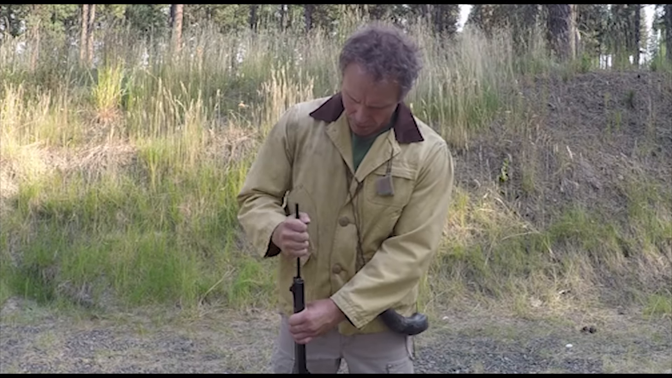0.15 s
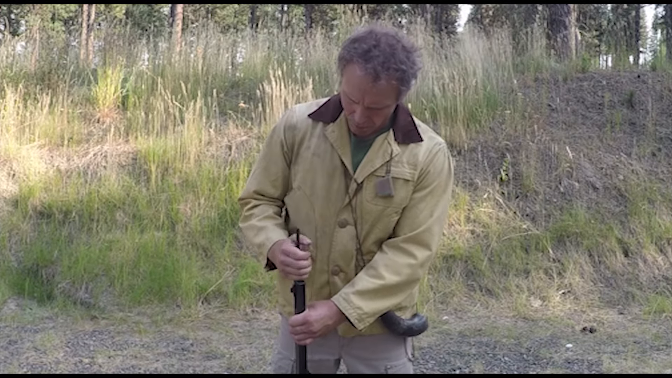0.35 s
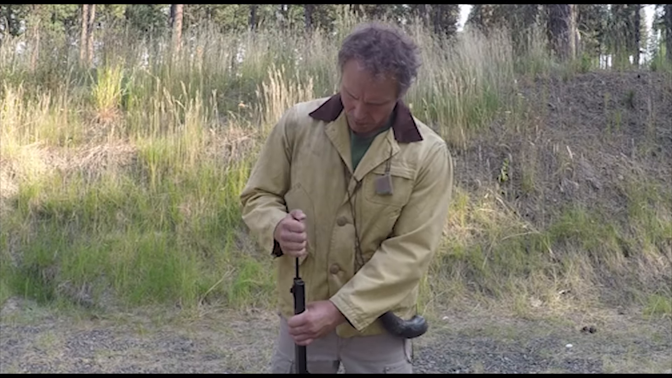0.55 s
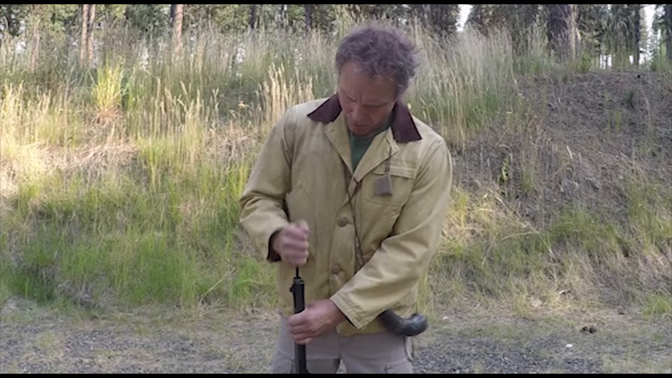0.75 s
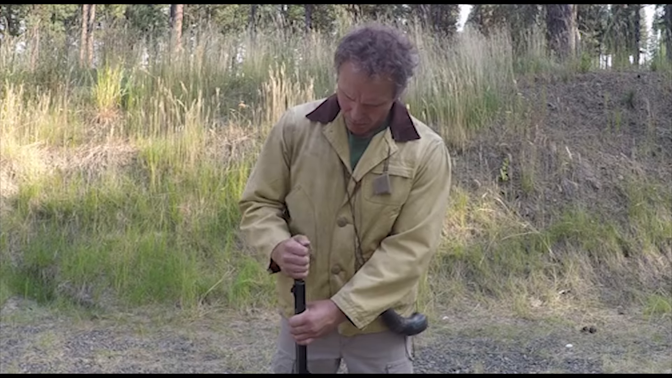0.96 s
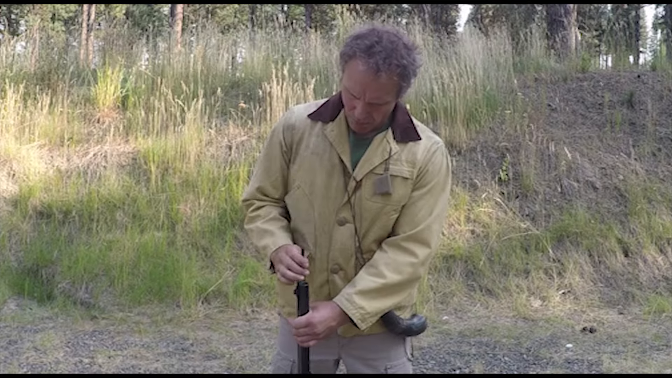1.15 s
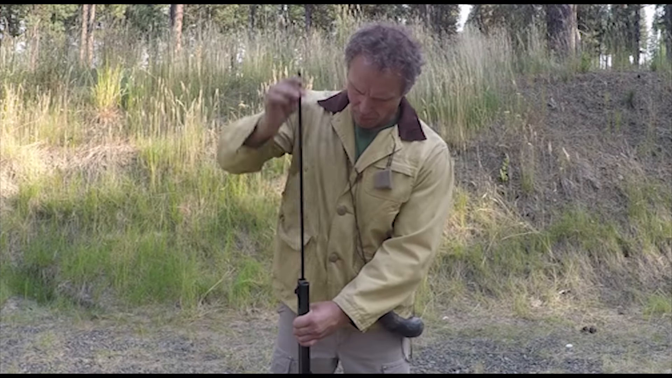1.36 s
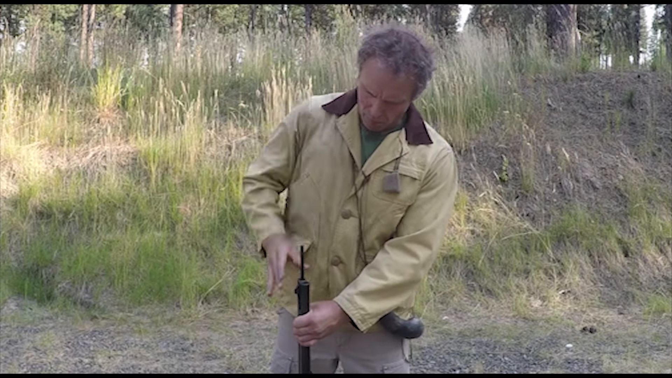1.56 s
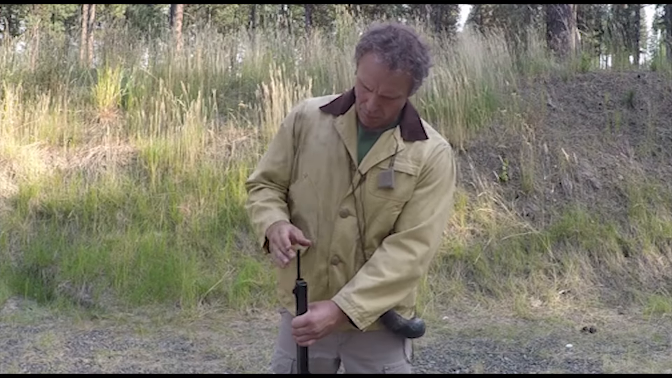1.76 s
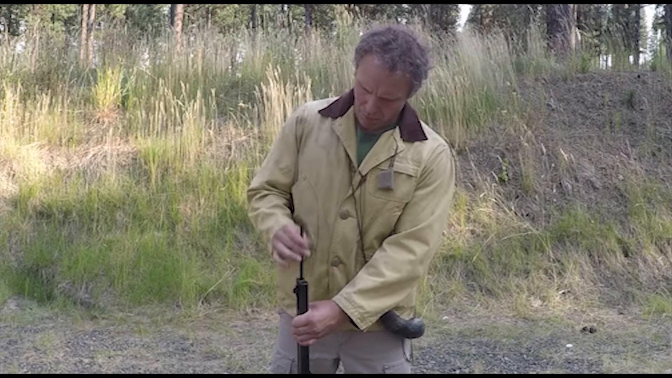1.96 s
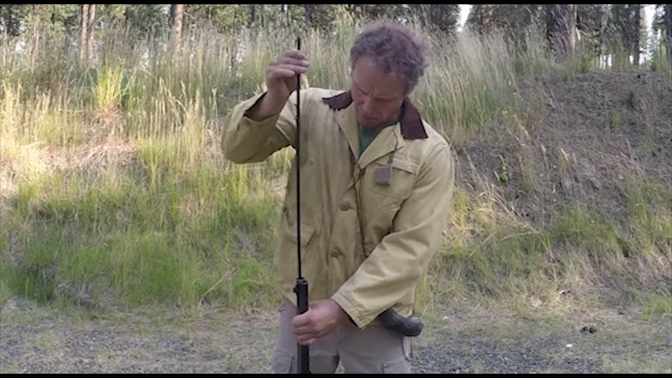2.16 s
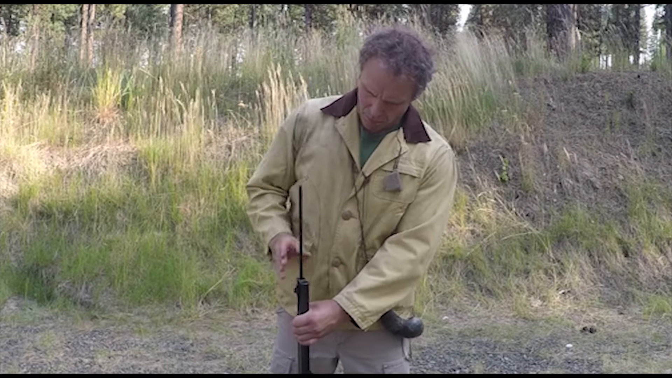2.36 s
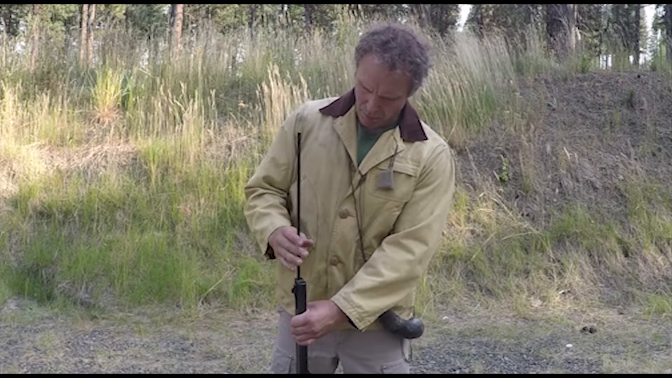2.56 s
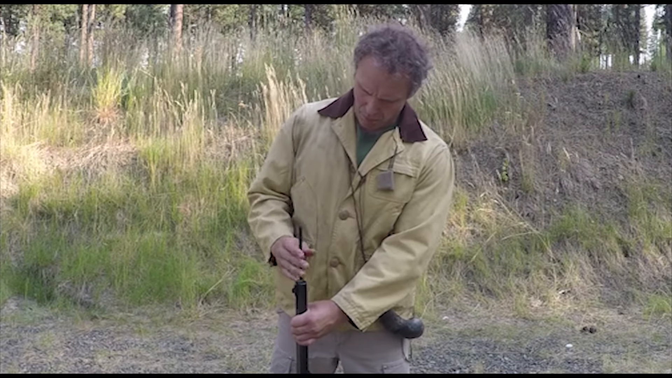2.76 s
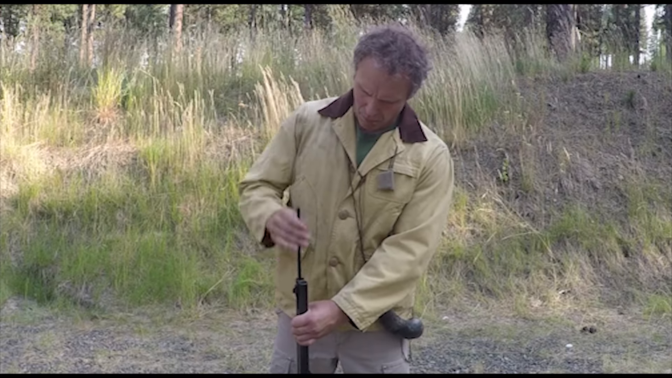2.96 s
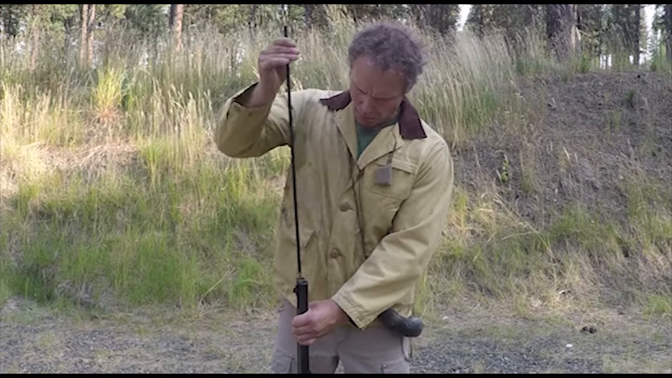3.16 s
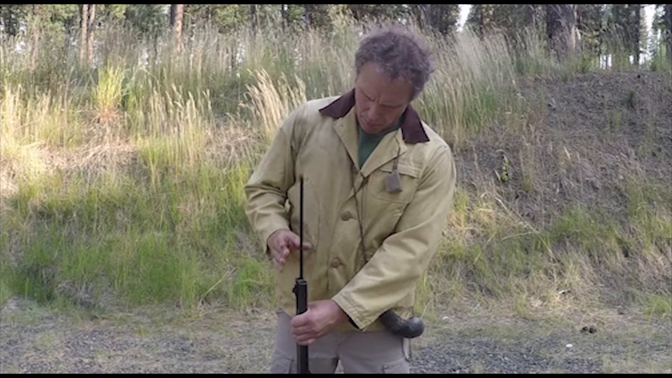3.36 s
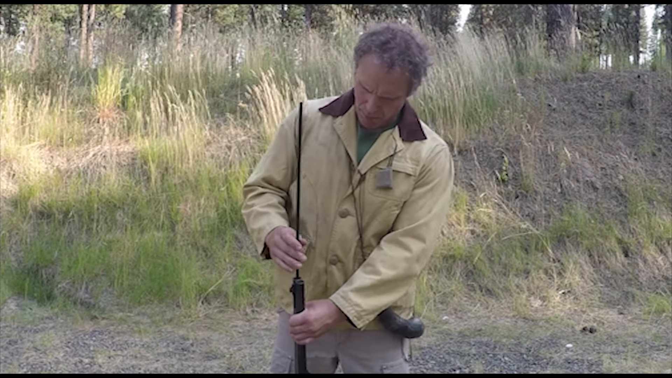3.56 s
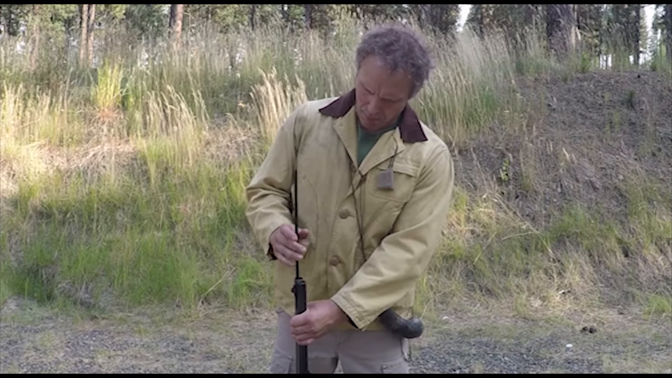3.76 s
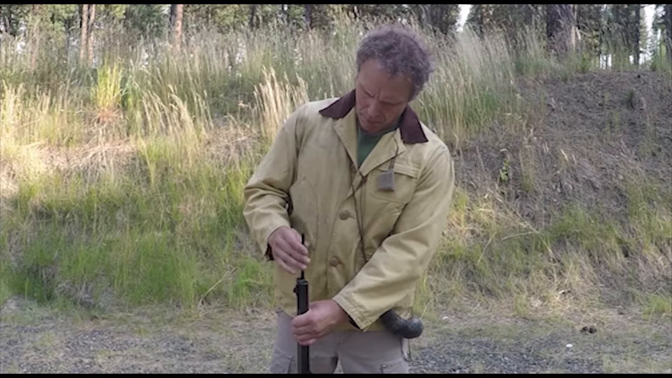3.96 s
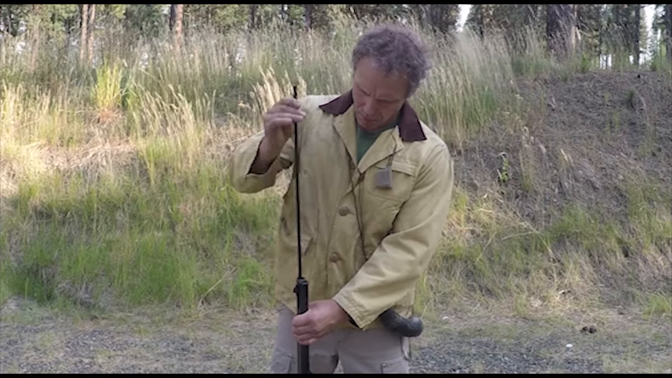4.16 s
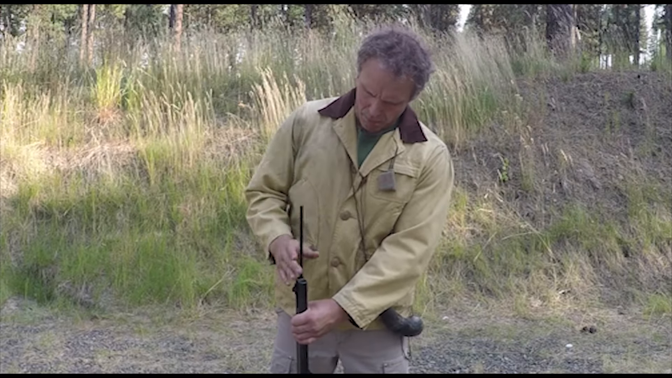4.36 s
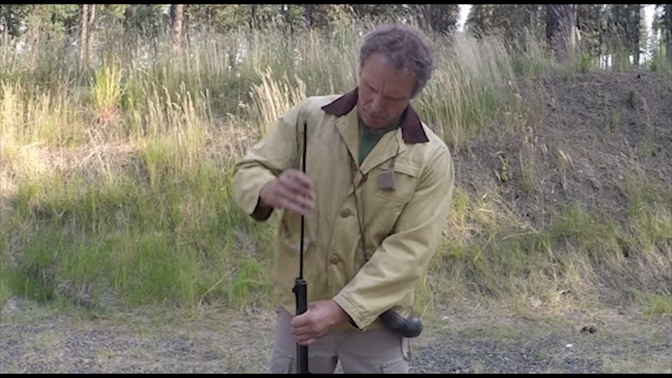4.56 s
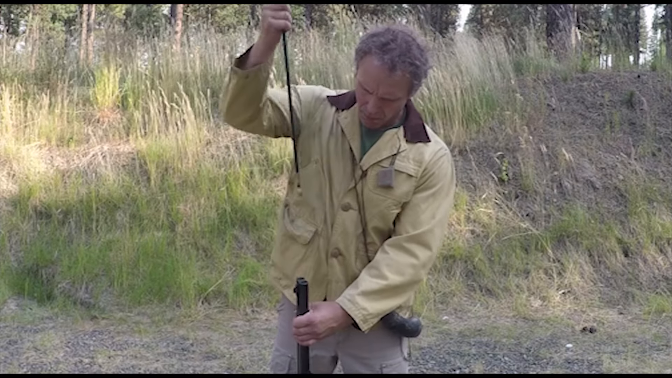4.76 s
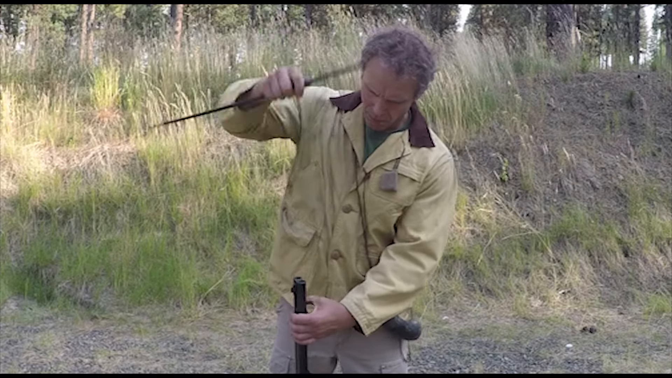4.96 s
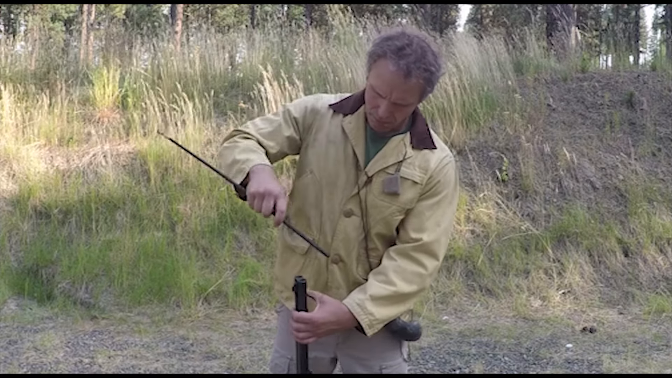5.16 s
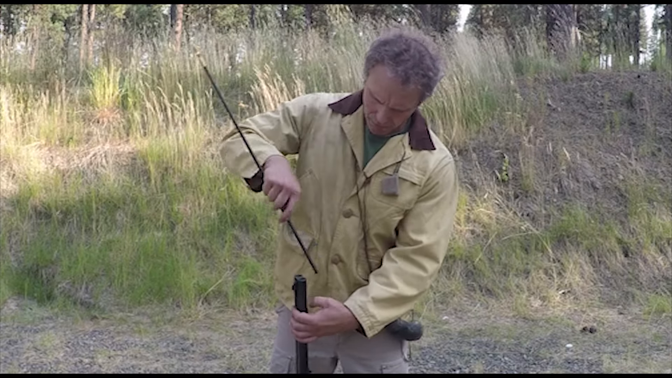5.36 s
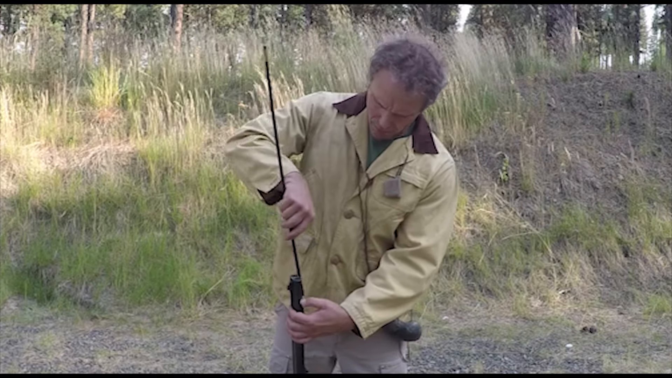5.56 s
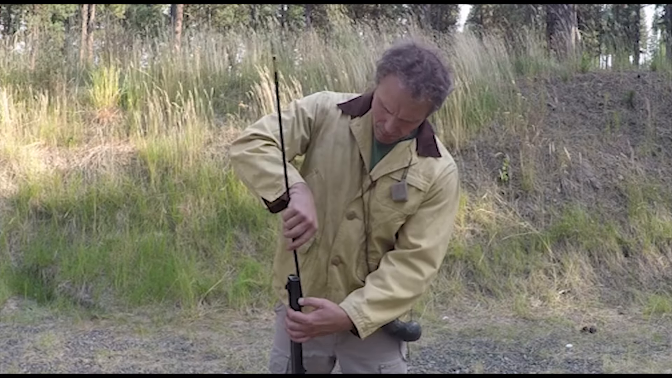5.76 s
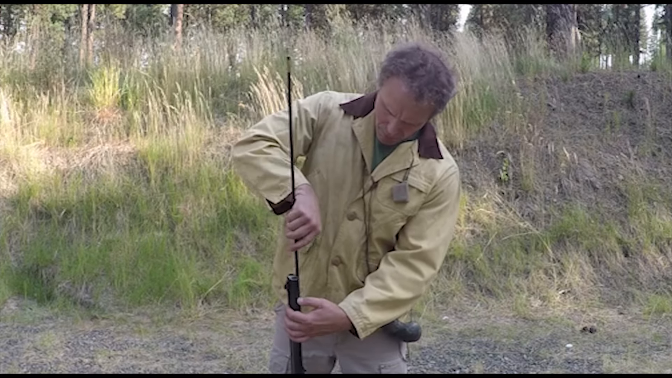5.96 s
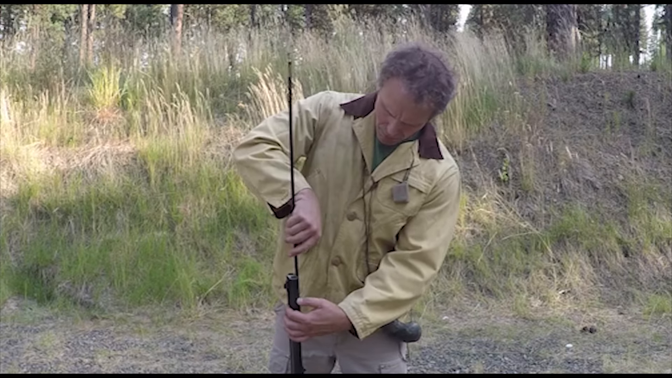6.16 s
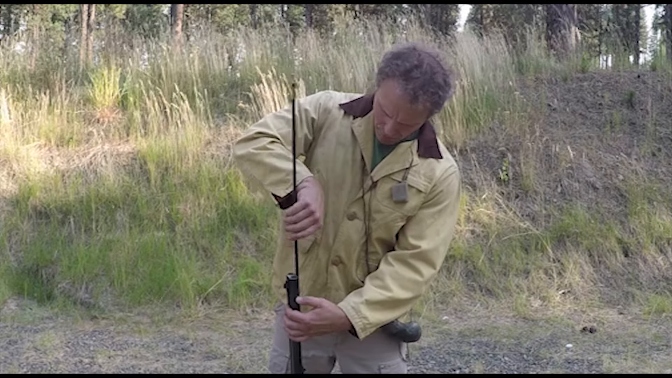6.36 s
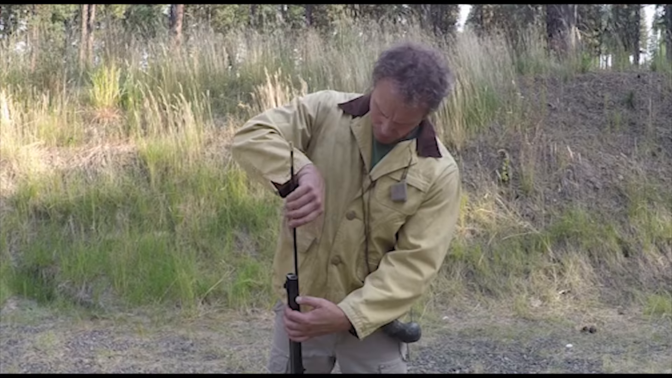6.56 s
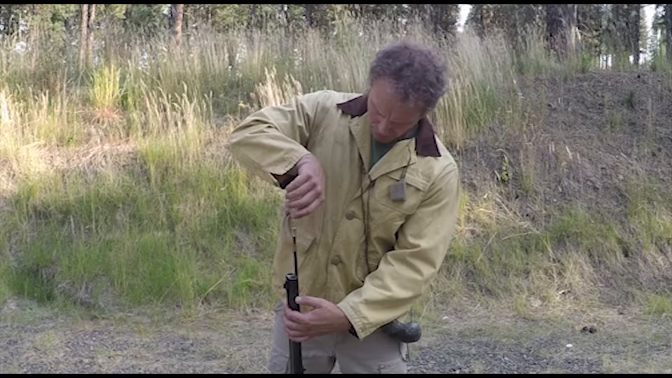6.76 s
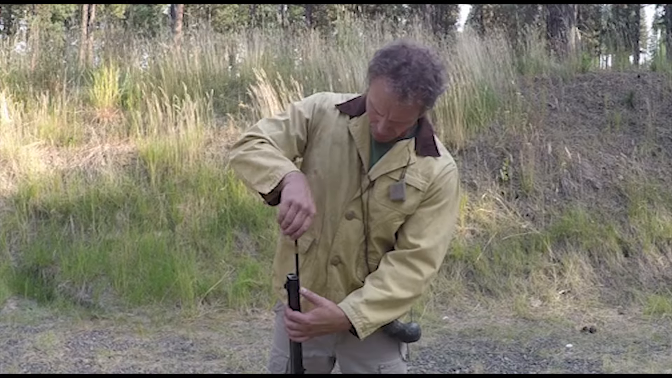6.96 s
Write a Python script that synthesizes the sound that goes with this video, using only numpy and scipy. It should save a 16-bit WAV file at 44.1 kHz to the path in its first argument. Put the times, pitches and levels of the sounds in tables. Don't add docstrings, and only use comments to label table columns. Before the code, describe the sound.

A steel ramrod is rammed and bounced down a rifle barrel, sharp metallic clacks with hollow booms and light rattling, then slid into its pipes outdoors.

```python
import sys
import numpy as np
from scipy import signal
from scipy.io import wavfile

SR = 44100
rng = np.random.default_rng(int(sys.argv[2]) if len(sys.argv) > 2 else 0)


def boost(x):
    u = np.asarray(x, float) / 20
    return 10 ** u


def master_out(mix):
    frames = np.transpose(np.atleast_2d(mix))
    ceiling = np.clip(frames, -1, 1)
    pcm = np.round(ceiling * 32767).astype(np.int16)
    wavfile.write(sys.argv[1], SR, pcm)


N = 308987

# (time [s], lowest note [Hz], fall [octaves/s], boom
# level [dB], time to fade 60 dB [s])
LANDINGS = [(0.0238, 263, 10.5, -18.5, 0.082), (0.2921, 169, 1.5, -19.5, 0.031),
            (0.4483, 155, 0.1, -27, 0.016), (0.8429, 164.4, 3, -16, 0.07), (1.648, 148.4, 0.11, -9.5, 0.08),
            (2.376, 148.8, 0.1, -7.5, 0.051), (2.876, 148.8, 0.1, -18.5, 0.092),
            (3.378, 150, 0.1, -8, 0.069), (3.941, 149.3, 0.073, -17, 0.09),
            (4.3668, 148.5, 0.1, -9.5, 0.042), (6.602, 645, 0.1, -25, 0.03), (6.795, 774, 0.1, -18, 0.051)]
# (time [s], clack level [dB], barrel ring re clack [dB],
# ring across the bore re clack [dB], barrel mode struck [Hz])
BLOWS = [(0.022, -8, 4, -1, 2290), (0.2915, -10.5, -4, -3.5, 1630), (0.8412, -4.5, -0.5, -14, 1730),
         (1.647, -8, 3.5, 4, 1350), (2.3768, -5.5, 0, 5, 1580), (2.8756, -15, 6, -1.5, 1350),
         (3.3786, -4.5, -0.5, 3.5, 1700), (3.942, -12, 5, -2, 1350), (4.367, -4.5, 6, 2, 2300),
         (6.6032, -9, -7, 3.5, 1890), (6.7965, -2, -6.5, 0.5, 1700)]


def ramrod():
    # (pitch [Hz], width [Hz], level [dB])
    rod_modes = [(2603, 57, 5), (2870, 160, 12), (3440, 250, -3.5), (3610, 100, 8), (4247, 120, 5),
                 (5150, 205, 7.5), (5324, 110, 3), (6420, 110, -6.5)]
    # (pitch [Hz], width [Hz], level [dB])
    barrel_modes = [(1220, 50, -6.5), (1350, 193, 0.5), (1580, 23, -3), (1700, 45, 1), (1838, 13.7, -3),
                    (1970, 37, -5), (2182, 36, -5.5)]
    # (pitch [Hz], width [Hz], level [dB])
    across_modes = [(8900, 300, -9), (10100, 300, -9), (11500, 400, -4), (12000, 300, -3), (12500, 340, -1),
                    (13000, 350, -2), (13800, 450, -4), (14600, 400, -8)]
    s, clack, ring, top, barrel_hz, rod_hz = contacts()
    steady = (sliding() + faint_ticks()) * boost([[-7.5], [-3.5], [-19]])
    steady += boost([[-1.5], [-8.5], [-6.5]]) * rattle(t60=0.062)
    shimmer = bore_shimmer(t60=0.56)
    steady[2] *= 0.44 + shimmer
    rod = metal(rod_modes, s, clack, rod_hz, 0.16, steady[0], (2200, 6800), broad_db=-6.0,
                modes_db=-9.5, hard=0.62, t60=0.033, lumpy_db=5.0, drag_hiss=1.7)
    barrel = metal(barrel_modes, s, clack + ring, barrel_hz, 0.05, steady[1], (1000, 2300), broad_db=-10.0,
                   modes_db=-0.5, hard=0.76, t60=0.046, lumpy_db=5.5, drag_hiss=1.0)
    across = metal(across_modes, s, clack + top, 0 * s + 12600, 0.22, steady[2], (6800, 14800), broad_db=-12.0,
                   modes_db=-8.5, hard=0.041, t60=0.035, lumpy_db=8.0, drag_hiss=1.0, tonal=shimmer)
    return rod + barrel + across


def contacts():
    # (time [s], clack level [dB], barrel ring re clack [dB],
    # ring across the bore re clack [dB], barrel mode struck [Hz])
    ramming = [
        (0.1206, -24.5, 1, 0, 1840),
        (0.1433, -30, -14, -9, 1350),
        (0.236, -26.5, -10, 1, 2280),
        (0.2475, -27, -12, -3, 1700),
        (0.5674, -24, 2, -19, 1700),
        (0.6595, -22.5, -3, -8, 1700),
        (0.6864, -37, -2, -13, 1700),
        (0.7546, -24.5, 1, 0, 2080),
        (0.761, -36, 6, -6, 1580),
        (1.2323, -23.5, -2, -15, 1220),
    ]
    throwing = [(1.557, -28, 0, -18, 1840), (1.5785, -34.5, 5, -1, 1580), (1.6355, -20.5, 3, -0.5, 2050),
                (2.281, -33, 3.5, -14, 1790), (2.308, -38, -8, 3, 1580), (2.37, -24, 5.5, -1.5, 1830),
                (3.284, -23.5, 0.5, -21, 1780), (3.319, -38, -1, 8, 1580), (3.357, -28.5, 3.5, -4, 1850),
                (3.372, -31, -2, 6, 1850), (4.28, -39.5, 5, -17, 1580), (4.319, -36, 6.5, 5, 1840),
                (4.347, -24, -6, 7, 1840)]
    stowing = [(5.567, -45.5, 10, -13, 1970), (5.6462, -40, 10.5, -20.5, 1838),
               (5.798, -36.5, 3, -17, 1840), (5.8927, -43, 5, 1, 1360), (6.385, -37.5, -1, -1, 1220),
               (6.7355, -19.5, 4, -40, 1454), (6.782, -34, 1, -9.5, 1840), (6.853, -43, 22, -6, 1874),
               (6.9122, -41, 6, -22, 2280), (6.9703, -49, 12.5, -11, 1830)]
    # (time [s], clack level [dB],
    # barrel ring re clack [dB], ring across the bore re clack [dB])
    rising = [(1.395, -34.5, -2, 3.5), (1.841, -36, 2.5, -5), (1.9792, -33.5, 0.5, -20),
              (2.028, -24.5, -7.5, 7), (2.0585, -42, 12, -14), (2.077, -29.5, -2, -1),
              (2.154, -38, -11, 13.5), (2.5587, -30, -4, -3), (2.581, -37, 8, -14), (2.617, -34.5, 6, 0),
              (2.9671, -28, -11, -28.5), (3.0046, -28.5, -3, 2), (3.0368, -27.5, -7, 5),
              (3.094, -36, -1, -15), (3.2194, -33.5, -5.5, 1.5), (3.4747, -34.5, 4.5, -20),
              (3.5048, -28.5, 10, 0), (3.5624, -37.5, -13, 9), (3.6067, -36, 2, -17), (3.6265, -36, 2, 5.5),
              (4.012, -24, -1, 1), (4.0628, -32.5, -4.5, 5), (4.133, -40, 6, -13), (4.147, -35.5, 4.5, -20),
              (4.186, -34, 3, -27), (4.551, -26, 1.5, -14), (4.5779, -18, -1, 0), (4.6035, -38, -3, -12),
              (4.6368, -37, 1, -1.5), (2.014, -39, -2, -5), (4.704, -35, 1, -14)]
    # (time [s], clack level [dB])
    whips = [(0.312, -19.5), (0.332, -24.5), (0.861, -15), (0.877, -28), (1.666, -16), (1.692, -23),
             (1.7118, -28), (1.7326, -31), (1.747, -31.5), (1.769, -30), (1.783, -30), (2.41, -30),
             (2.421, -27), (2.4438, -27), (2.461, -41), (2.478, -35), (2.9, -23), (2.934, -40),
             (2.958, -43), (3.404, -22.5), (3.42, -29), (3.441, -50), (3.9885, -23), (4.001, -31),
             (4.0888, -37.5), (4.392, -22), (4.404, -22.5), (4.4348, -24.5), (4.4725, -37)]
    dull_hz, sharp_hz, sharp_from_db = 1838, 1580, -0.5
    whip_ring_db, whip_top_db, blow_rod_hz = (-11, -1.5), (-2.5, 5), (2800, 5260)

    knocks = ramming + throwing + stowing
    for row in rising:
        knocks = knocks + [(*row, sharp_hz if row[3] > sharp_from_db else dull_hz)]
    for s, clack_db in whips:
        knocks = knocks + [(s, clack_db, whip_ring_db[seated(s)], whip_top_db[seated(s)], dull_hz)]
    rows = []
    for row, luck in zip(knocks, rng.standard_normal(len(knocks))):
        octaves_up = 0.5 * row[3] + 0.25 * luck
        rows.append((*row, 4500 * 2 ** octaves_up))
    for row in BLOWS:
        rows.append((*row, blow_rod_hz[seated(row[0])]))
    return np.transpose(rows)


def seated(s):
    return int(1.62 < s < 4.66)


def metal(modes, hit_s, hit_db, struck_hz, reach, steady, edges_hz, broad_db, modes_db,
          hard, t60, lumpy_db, drag_hiss, tonal=1):
    drive = np.tile(steady, (len(modes) + 1, 1))
    knots = np.arange(0, N + SR, SR // 25)
    for row, wander in zip(drive[:-1], rng.standard_normal((len(modes), len(knots)))):
        row *= boost(5 * np.interp(np.arange(N), knots, wander) - 2)
    drive[-1] *= drag_hiss
    apart = np.log2(np.array(modes)[:, 0] / struck_hz[:, None]) / reach
    shares_db = -13 * (1 - np.exp(-apart ** 2)) + 0.38 * rng.standard_normal(apart.shape)
    shares_db -= hard * np.maximum(hit_db + 25.0, 0)[:, None]
    for s, level_db, share_db in zip(hit_s, hit_db, shares_db):
        gains = boost(np.append(share_db, 0))[:, None]
        place(drive, s, gains * contact_fade(s, level_db, t60))
    drive *= grit(lumpy_db)
    rung = 0
    for k, (row, (hz, width_hz, db)) in enumerate(zip(drive, modes)):
        ring_width_hz = max(width_hz, 38)
        rung = rung + (-1) ** k * boost(db) * resonate(row, hz, ring_width_hz)
    return boost(modes_db) * tonal * rung + boost(broad_db) * band(drive[-1], *edges_hz)


def contact_fade(s, level_db, t60):
    light_db = -17.5
    t = np.arange(SR // 6) / SR
    lasts = t60 * (0.55 if level_db < light_db else 1)
    crack = 0.81 * boost(-60 * t / 0.0055)
    chatter = boost(-60 * t / lasts)
    tail = 0.1 * boost(-60 * t / lasts / 4.5)
    fade = np.minimum(t / 0.0005, 1) * boost(level_db) * (crack + chatter + tail)
    if seated(s) and level_db > light_db:
        late = round(0.0052 * SR)
        fade[late:] = np.maximum(fade[late:], boost(-4) * fade[:-late])
    return fade


def sliding():
    # (time [s], length [s], level [dB])
    slides = [(0, 0.011, -38), (0.094, 0.24, -48.5), (0.56, .055, -50), (0.652, 0.081, -47),
              (.76, 0.11, -57), (1.326, 0.17, -48.5), (1.536, 0.13, -45.5), (1.685, 0.087, -42),
              (1.839, 0.02, -43), (1.996, 0.19, -48), (2.262, 0.2, -47.5), (2.465, 0.046, -41),
              (2.568, 0.069, -45), (2.954, 0.033, -44), (3.054, 0.13, -48.5), (3.265, 0.18, -42),
              (3.423, 0.18, -49.5), (3.6, 0.095, -54), (3.77, 0.072, -58), (3.994, 0.14, -54),
              (4.114, 0.59, -48), (4.318, 0.18, -38), (4.54, 0.27, -51), (6.756, 0.087, -48)]
    out = np.zeros(N)
    for s, length, level_db in slides:
        place(out, s, boost(level_db) * np.hanning(round(length * SR)) ** 0.25)
    return out * boost(2.5 * drift(45))


def faint_ticks():
    # (time [s], level [dB])
    ticks = [
        (1.059, -46.5),
        (1.147, -50.5),
        (1.312, -47),
        (1.34, -46),
        (1.505, -43),
        (1.9, -41.5),
        (3.064, -51),
        (3.773, -45),
        (3.794, -51),
    ]
    out = np.zeros(N)
    fade = boost(-60 * np.arange(SR // 20) / SR / 0.039)
    for s, level_db in ticks:
        place(out, s, boost(level_db + 4.5) * fade)
    return out


def rattle(t60):
    shiver_db = (-55, -5.5)
    out, t = np.zeros(N), np.arange(SR // 4) / SR
    for s, clack_db, *_ in BLOWS:
        level_db = clack_db + shiver_db[seated(s)]
        place(out, s, np.minimum(t / 0.015, 1) * boost(level_db - 60 * t / t60))
    return out * boost(0.79 * drift(67))


def bore_shimmer(t60):
    out, t = np.full(N, 0.12), np.arange(SR // 3) / SR
    for s, *_ in LANDINGS:
        if seated(s):
            place(out, s, boost(-60 * t / t60))
    return out


def air_column():
    # (pitch [Hz], level [dB])
    muzzle = [(150, -7), (250, 13), (450, -3.5), (740, 0.5), (1050, -5), (1300, -1.5), (1650, -6),
              (2550, -7), (3600, -6.5), (5000, -18)]
    out, t = np.zeros(N), np.arange(SR // 5) / SR
    odd = np.arange(1, 32, 2)[:, None]
    luck = rng.standard_normal((len(LANDINGS), 2, len(odd), 1))
    thud = band(rng.standard_normal(N), 49.96, 730)
    hz, muzzle_db = np.transpose(muzzle)
    for (s, note_hz, fall, level_db, t60), (strength, phase) in zip(LANDINGS, luck):
        pitch = odd * note_hz * 2 ** (-fall * t)
        first_hz = pitch[:, :1]
        loss_db = 60 * t / t60 * (1 + first_hz / 8000)
        gain = boost(np.interp(np.log(first_hz), np.log(hz), muzzle_db) + 1.5 * strength - loss_db)
        turns = np.cumsum(pitch, axis=1) / SR
        boom = np.sum(gain * np.sin(2 * np.pi * turns + 3 * phase), axis=0)
        i = round(s * SR)
        boom += boost(-4 - 60 * t / 0.055) * thud[i:i + len(t)]
        boom += seated(s) * boost(-15 - 60 * t / 0.15) * np.sin(2 * np.pi * 85 * t)
        place(out, s, boost(level_db) * np.minimum(t / 0.0031, 1) * boom)
    return out


def clear_notes():
    # (time [s], pitch [Hz], level [dB], time to fade 60 dB [s])
    struck = [(0.023, 1310, -11, 0.043), (0.1212, 2000, -28, .05), (3.038, 1900, -32.5, .05),
              (3.357, 1850, -28, 0.046), (3.5062, 2030, -27, 0.059), (2.029, 2000, -31, .06),
              (2.06, 2400, -32, 0.077), (1.648, 520, -15.5, 0.066), (1.648, 2900, -13, 0.053),
              (1.648, 2550, -10, 0.085), (2.877, 3100, -21, .12), (2.378, 205, -20, 0.078),
              (2.377, 820, -15, 0.087), (2.378, 2550, -21, 0.053), (4.367, 445, -16, 0.048),
              (1.98, 1230, -31.5, 0.054), (2.08, 5000, -27, 0.033), (2.153, 1580, -36, .07),
              (5.797, 1266, -28.5, 0.11), (4.012, 2000, -26, .12), (4.132, 1840, -33, 0.13),
              (1.397, 1850, -34, .07), (5.647, 1880, -44, .1), (6.604, 4600, -23, 0.088),
              (6.74, 1600, -33, 0.13), (6.74, 3300, -31, 0.072), (6.797, 1900, -12, 0.077),
              (6.798, 2950, -21.5, 0.099)]
    out, t = np.zeros(N), np.arange(SR // 8) / SR
    for s, hz, level_db, t60 in struck:
        fade = boost(level_db - 60 * t / t60) * np.minimum(t / 0.0018, 1)
        place(out, s, fade * np.sin(2 * np.pi * hz * t))
    return out


def soft_rubs():
    # (time [s], length [s], pitch [Hz], width [Hz], level [dB])
    strokes = [(0.032, 0.1, 4300, 4200, -32), (0.04, 0.091, 10700, 7000, -44),
               (0.263, 0.03, 4280, 4000, -43), (2.072, 0.061, 5430, 4500, -44),
               (4.578, 0.11, 4330, 3030, -47), (4.597, 0.1, 8650, 5000, -44.5),
               (6.42, 0.17, 2800, 2400, -45.5), (6.452, 0.026, 2730, 500, -32.5),
               (6.475, 0.026, 3620, 500, -42), (6.47, 0.015, 2210, 300, -49),
               (6.481, 0.022, 1950, 248, -41.5), (6.495, .015, 1540, 251, -42),
               (6.506, 0.03, 2870, 450, -46), (6.547, 0.018, 2960, 300, -45),
               (6.7336, 0.0065, 3250, 900, -20.5), (5.768, 0.015, 2300, 400, -48),
               (0.297, 0.0058, 1700, 353, -12), (6.43, 0.13, 7800, 1200, -59.5)]
    return friction(strokes, soft=0.91, catch_db=2.5)


def biting_scrapes():
    # (time [s], length [s], pitch [Hz], width [Hz], level [dB])
    strokes = [(0.04, 0.056, 4300, 4800, -28), (0.043, 0.061, 10700, 6100, -38),
               (0.071, .022, 3800, 300, -33), (0.053, .04, 2800, 140, -41),
               (0.8408, 0.0064, 16000, 3700, -14.5), (0.95, 0.053, 127, 76, -30),
               (4.58, .07, 1800, 57, -42), (3.8, .045, 1840, 40, -41), (4.595, 0.032, 2920, 200, -38.5),
               (4.63, 0.03, 4400, 250, -39.5), (4.615, .033, 6400, 250, -42),
               (4.658, 0.013, 2950, 140, -43), (4.695, 0.024, 2980, 180, -43),
               (4.693, 0.055, 1850, 60, -50), (4.64, 0.032, 10000, 900, -52),
               (4.577, 0.0063, 13000, 2100, -26), (4.577, 0.0092, 3500, 3500, -26),
               (0.122, 0.067, 4000, 500, -46), (2.3, .045, 1580, 180, -41.5), (2.28, .035, 2900, 270, -42),
               (2.28, .02, 4200, 500, -41.5), (3, 0.029, 1700, 120, -40), (3.941, 0.0098, 13200, 2500, -31)]
    return friction(strokes, soft=0.3, catch_db=3.0)


def friction(strokes, soft, catch_db):
    out = np.zeros(N)
    rough = rms_one(grit(lumpy_db=1.2) * boost(catch_db * drift(70)))
    for s, length, hz, width_hz, level_db in strokes:
        i = round(s * SR)
        swell = np.hanning(round(length * SR)) ** soft
        start = max(i - SR // 20, 0)
        noise = band(rough[start:i + len(swell)], hz - width_hz / 2, hz + width_hz / 2)
        place(out, s, boost(level_db) * swell * noise[i - start:])
    return out


def brass_pipe():
    # (time [s], level [dB])
    pipe_hits = [
        (6.6024, -19),
        (6.612, -32),
    ]
    # (pitch [Hz], level [dB], time to fade 60 dB [s])
    pipe_modes = [(1376, -15, 0.14), (1866, -4, 0.14), (2210, -9, .06), (2912, -2, 0.11), (3110, -8, .07),
                  (4199, -9, 0.1), (4900, -13, .07), (7800, 0.5, .04), (8204, -2.5, 0.033),
                  (10130, -6, 0.078), (11460, -16, .15)]
    out, t = np.zeros(N), np.arange(SR // 5) / SR
    knots = np.arange(0, 0.21, 0.006)
    for s, hit_db in pipe_hits:
        lucks = rng.standard_normal((len(pipe_modes), len(knots)))
        for (hz, level_db, t60), luck in zip(pipe_modes, lucks):
            flutter_db = 5 * np.interp(t, knots, luck)
            gain = boost(hit_db + level_db - 60 * t / t60 + flutter_db) * np.minimum(t / 0.00092, 1)
            place(out, s, gain * np.sin(2 * np.pi * hz * t + 3 * luck[0]))
    return out


def bird():
    # (time [s], length [s], start pitch [Hz], lowest pitch [Hz], level [dB])
    chirps = [
        (0.8, .04, 7900, 7000, -50),
        (2.578, 0.056, 8800, 6850, -47),
        (5.48, .05, 7000, 6600, -57),
    ]
    end_hz = 7300
    out = np.zeros(N)
    for s, length, start_hz, low_hz, level_db in chirps:
        u = np.linspace(0, 1, round(length * SR))
        hz = low_hz + np.where(u < 0.5, start_hz - low_hz, end_hz - low_hz) * (2 * u - 1) ** 2
        whistle = np.sin(2 * np.pi * np.cumsum(hz) / SR)
        place(out, s, boost(level_db) * np.sin(np.pi * u) ** 0.6 * whistle)
    return out


def distant_trees():
    # (pitch [Hz], level [dB per Hz])
    leaf_colour = [(35, -37), (60, 3.5), (113, -7), (352, -7), (378, -6), (488, -6), (894, -12),
                   (1270, -19.5), (1930, -22.5), (2380, -24), (4160, -25.5), (4780, -27.5), (14300, -37),
                   (15700, -39)]
    # (time [s], level [dB])
    leaf_level = [
        (0.0, -43.5),
        (0.43, -46),
        (7.0, -44.5),
    ]
    return boost(in_time(leaf_level) + 4) * coloured(leaf_colour, patchy_db=1.05, rate=11)


def wind():
    # (time [s], level [dB])
    gusts = [(0.0, -49), (0.45, -25), (0.64, -44), (0.82, -31.5), (0.97, -41.5), (1.67, -37), (1.83, -51),
             (2.4, -37), (2.94, -52), (3.1, -27), (3.8, -40.5), (5.5, -39.5), (5.56, -48.5), (6.0, -34),
             (6.08, -42.5), (6.28, -32.5), (6.96, -35), (7.0, -44)]
    # (pitch [Hz], level [dB per Hz])
    gust_colour = [(8.2, -34), (14, 9.5), (40, 4), (64, -11.5), (110, -17), (130, -37), (200, -32.5),
                   (260, -71.5), (440, -120)]
    return boost(in_time(gusts) + 2.5) * coloured(gust_colour, patchy_db=0.5, rate=5)


def place(out, s, sound):
    i = round(s * SR)
    out[..., i:i + sound.shape[-1]] += sound[..., :N - i]


def rms_one(x):
    return x / np.sqrt(np.mean(x ** 2) + 1e-20)


def in_time(rows):
    s, level_db = np.transpose(rows)
    return np.interp(np.arange(N) / SR, s, level_db)


def band(x, low_hz, high_hz):
    high_hz = min(high_hz, 0.45 * SR)
    sos = signal.butter(3, [low_hz, high_hz], "band", fs=SR, output="sos")
    return signal.sosfilt(sos, x) * np.sqrt(SR / 2 / (high_hz - low_hz))


def resonate(x, hz, width_hz):
    r = np.exp(-np.pi * width_hz / SR)
    feed = np.sqrt((1 - r * r) / 2) * np.array([1, 0, -1])
    return signal.lfilter(feed, [1, -2 * r * np.cos(2 * np.pi * hz / SR), r * r], x + 1e-18)


def drift(rate):
    r, steps = np.exp(-16 * np.pi * rate / SR), N // 8 + 2
    white = rng.standard_normal(steps + SR // 8)
    slow = signal.lfilter([1], [1, -2 * r, r * r], white)[SR // 8:]
    return np.interp(np.arange(N) / 8, np.arange(steps), rms_one(slow))


def grit(lumpy_db):
    return rms_one(rng.standard_normal(N) * boost(min(lumpy_db, 2) * drift(220)))


def coloured(spectrum, patchy_db, rate):
    hz, level_db = np.transpose(spectrum)
    edges = hz[0] * 2 ** np.arange(0, np.log2(hz[-1] / hz[0]) + 0.3, 1 / 3)
    white, out = rng.standard_normal((2, N + SR)), 0
    for k, (low, high) in enumerate(zip(edges, edges[1:])):
        middle = np.log(low * high) / 2
        gain = boost(np.interp(middle, np.log(hz), level_db) + patchy_db * drift(rate))
        out = out + gain * np.sqrt(high - low) * band(white[k % 2], low, high)[SR:]
    return rms_one(out)


def scene():
    rifle = ramrod() + air_column() + clear_notes() + soft_rubs() + biting_scrapes() + brass_pipe()
    return (rifle + bird() + distant_trees() + wind())[None]


def roll_off(x):
    return signal.sosfilt(signal.butter(12, 15830, fs=SR, output="sos"), x)


def record(dry):
    cut = signal.cheby2(14, 35, 15750, fs=SR, output="sos")
    mix = np.clip(signal.sosfilt(cut, dry), -0.99, 0.99)
    return roll_off(mix)


dry = scene()
out = record(dry)
master_out(out)
```